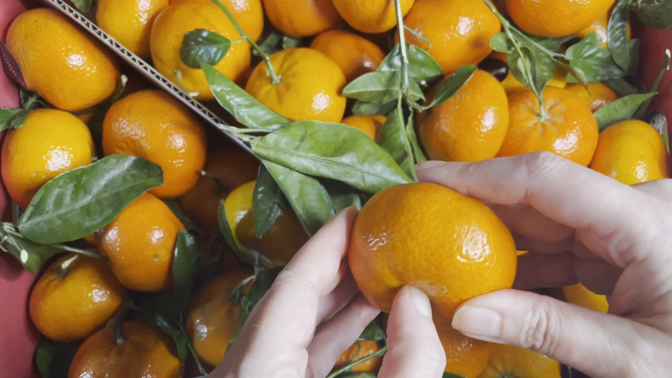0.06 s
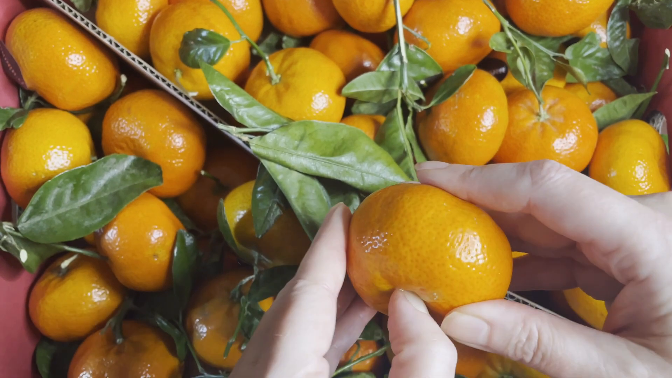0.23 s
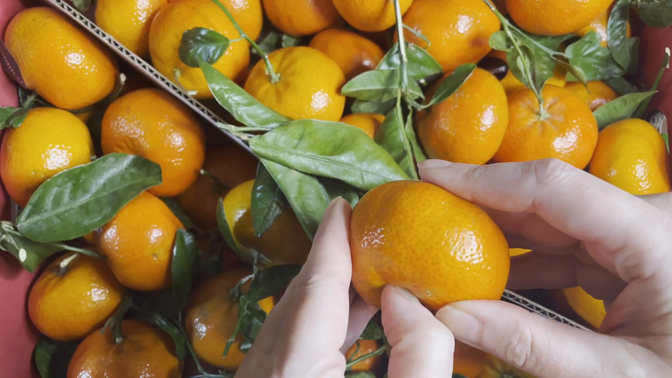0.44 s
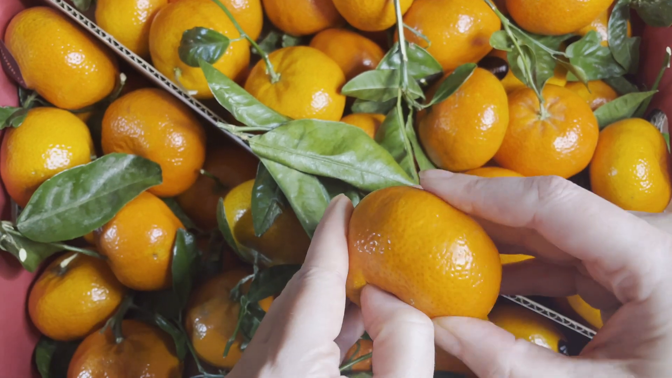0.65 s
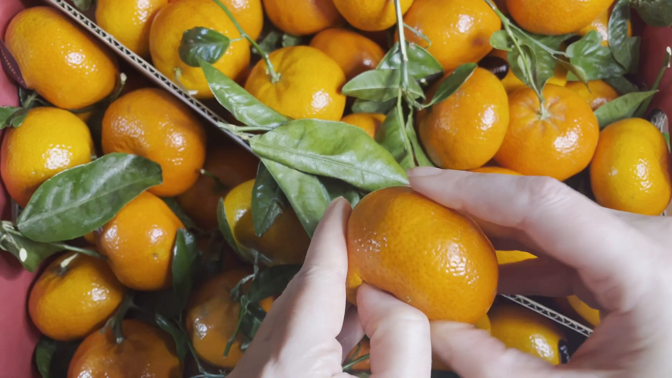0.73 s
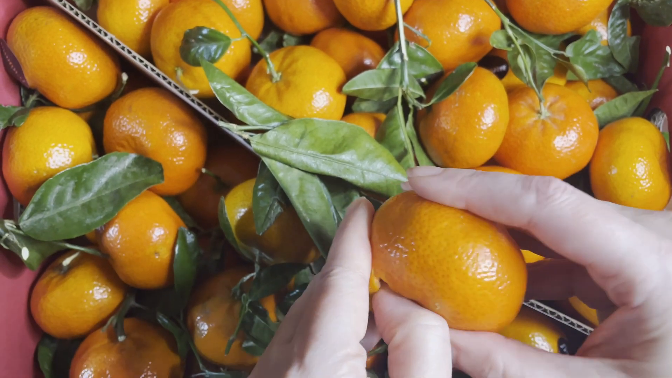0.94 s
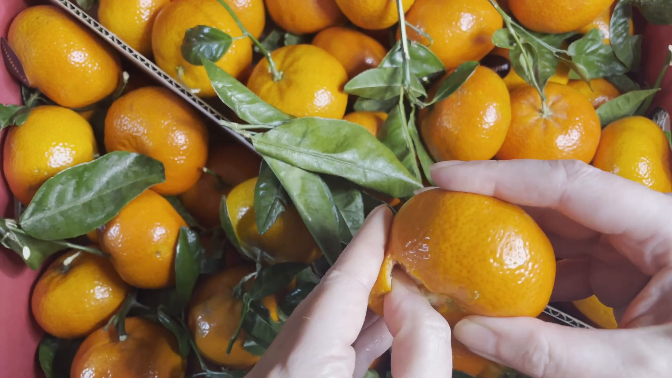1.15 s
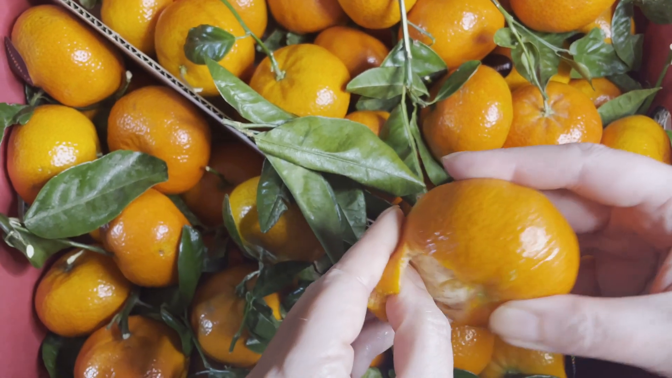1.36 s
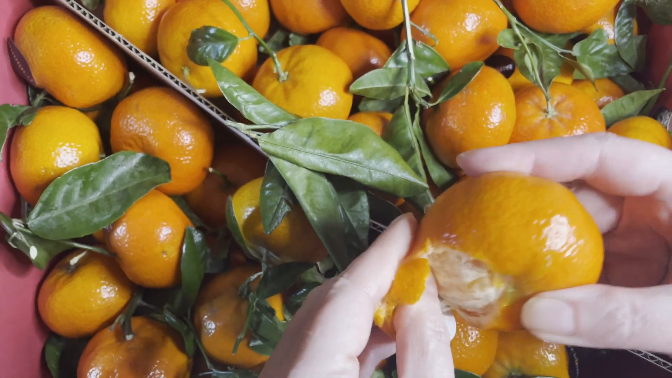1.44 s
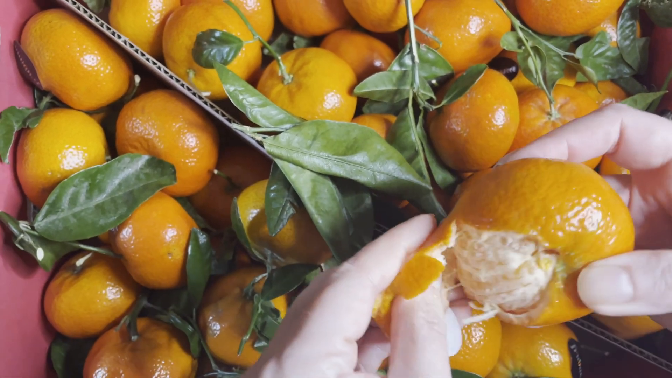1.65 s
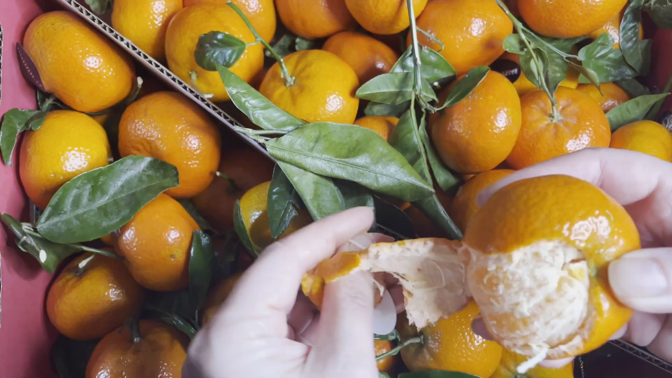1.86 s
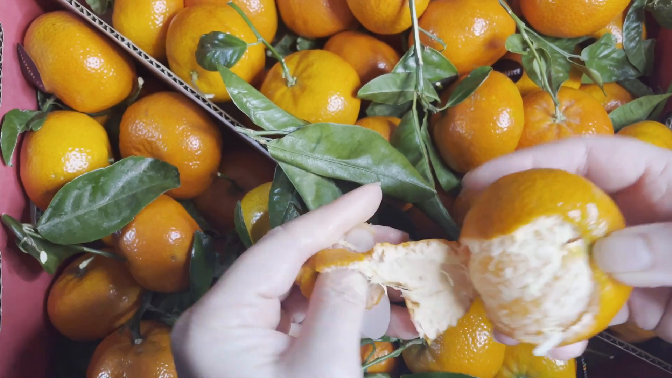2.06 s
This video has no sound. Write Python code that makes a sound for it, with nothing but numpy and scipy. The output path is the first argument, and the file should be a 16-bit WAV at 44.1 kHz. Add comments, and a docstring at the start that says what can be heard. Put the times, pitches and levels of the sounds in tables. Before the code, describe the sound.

Close up, hands tear the peel off a mandarin: a thin squeak and sharp little snaps first, then ticking fibres and brief runs of fine crackle, over the soft, steady hum of a room.

```python
"""A mandarin is peeled by hand, close to a pair of microphones in a humming room.
The moist skin squeaks under the thumb, then bursts in a few sharp snaps. Fibres of pith (the white
layer under the skin) part in ticks and a fine crackle, and the strip of peel flutters as it comes free.
Fingertips rub softly on the rind, and the fruit in the cupped hands rings briefly after each crack."""
import sys
import numpy as np
from scipy import signal
from scipy.fft import rfft, irfft
from scipy.io import wavfile
from scipy.ndimage import uniform_filter1d

SR = 44100
rng = np.random.default_rng(int(sys.argv[2]) if len(sys.argv) > 2 else 0)


def log_audio(samples):
    """Write samples as a 16-bit WAV file to the path given in sys.argv[1]."""
    # one column per channel
    frames = np.atleast_2d(samples).T
    # limit to full scale, then quantise
    limited = np.clip(frames, -1, 1)
    pcm = np.round(limited * 32767).astype(np.int16)
    wavfile.write(sys.argv[1], SR, pcm)


N = 92610
TAPS = 2048  # samples in one filter or one burst
TIME = np.arange(N) / SR
SCENE_HZ, FILTER_HZ = np.fft.rfftfreq(N, 1 / SR), np.fft.rfftfreq(TAPS, 1 / SR)

# Tones of an appliance: pitch_hz, level_db, waver_amount
HUM_TONES = [(59, -61.5, 0), (117, -65, 0.18), (167.8, -68.5, 0.7), (250.37, -52.5, 0.32)]
# Tone colour of the room noise: frequency_hz, gain_db
AIR_COLOUR = [(20, -22), (40, 2.5), (60, 15), (85, 10.5), (140, 5.5), (190, 12), (240, 4), (450, -9.5),
              (900, -21), (2000, -32.5), (10000, -27), (15500, -33.5)]
# Stereo width of the room noise: frequency_hz, side_over_mid_db
AIR_WIDTH = [(50, -14), (200, -3.5), (500, 0.5)]
# Time the room's echo takes to fade by 60 dB: frequency_hz, fade_s
ROOM_FADE = [(300, 0.36), (2000, 0.21), (6000, 0.36), (13000, 0.27)]
# Sound bouncing off the hands and fruit: frequency_hz, gain_db
BOUNCE_COLOUR = [(200, -30), (600, -4), (1400, -14), (5200, -4), (7500, -9), (15000, -22)]
# How the two microphones differ: frequency_hz, left_lead_radians, left_over_right_db
MIC_PAIR = [(0, 0, 2.6), (600, 0, 3.8), (1250, -.2, .8), (2400, .5, 2), (4000, .7, .8), (5200, 1.4, 0),
            (5400, 4.8, 0), (6500, 4.5, 0), (7350, 3.14, 0), (17000, -5.1, 0)]
# Ringing of the fruit and cupped hands: pitch_hz, width_hz, gain_db
HOLLOW_RINGS = [(1447, 260, 0), (2300, 140, -2)]
# Fingertips sliding: middle_s, half_length_s, level_db
FINGER_RUBS = [(0, 0.027, -58.5), (.565, 0.033, -64)]
# Path of the squeak: time_s, pitch_hz, relative_level_db
SQUEAK_PATH = [(.08, 11000, -56), (0.092, 9300, -48.5), (.117, 9030, -46.5), (0.13, 7500, -51),
               (.15, 8320, -51.5), (0.162, 9220, -44.5), (.198, 11830, -49.5)]
# The loose strip sounds lower as it grows: time_s, low_cut_hz
STRIP_LOW_CUT = [(1.1, 1130), (1.8, 447)]
# Tone colour of the pith: frequency_hz, gain_db
PITH_COLOUR = [(100, -24), (400, -5.5), (900, -5), (2000, -1.5), (4500, 1.5), (7000, -1.5), (9000, -2),
               (11500, -4.5), (15500, -16.5)]
# How hard the peel tears: time_s, relative_level_db
TEAR_STRENGTH = [(.2, -75.5), (.35, -91), (.5, -84.5), (.6, -68.5), (.85, -76.5), (.95, -67), (1.03, -70),
                 (1.11, -50.5), (1.2, -69), (1.28, -68), (1.36, -47), (1.42, -62), (1.46, -55),
                 (1.55, -71.5), (1.62, -55), (1.66, -56.5), (1.705, -45.5), (1.75, -55.5), (1.8, -59),
                 (1.85, -76)]
# Single fibres parting: time_s, relative_level_db, brightness_db_per_octave
FIBRE_TICKS = [ (0.077, -46, -9.5), (0.547, -48.5, -2.5), (0.599, -52.5, -8), (0.686, -44.5, 6),
               (0.7867, -38.5, -3), (0.817, -43.5, 11), (0.8994, -39, -1.5), (0.937, -47, -13),
               (0.9737, -39, 3), (1.0432, -39.5, -1.5), (1.0495, -34.5, 6.5), (1.0614, -38.5, 0.5),
               (1.0647, -34.5, -6), (1.0672, -43, 14), (1.0849, -31.5, 11), (1.1049, -34.5, 7),
               (1.11, -39.5, -6.5), (1.1351, -40, 1.5), (1.1552, -36, 0.5), (1.2718, -39, 0),
               (1.294, -29.5, 10.5), (1.3, -37.5, 3.5), (1.3326, -37, 4), (1.3415, -40, 2),
               (1.3654, -29, -1), (1.379, -45, -2), (1.402, -34, 5.5), (1.451, -40.5, 0.5),
               (1.4683, -32.5, -3.5), (1.4805, -34, -2), (1.5748, -36, 3.5), (1.579, -40, -3),
               (1.5916, -30.5, 10.5), (1.612, -38.5, -1), (1.6233, -32.5, 1.5), (1.6359, -30.5, 0.5),
               (1.681, -37, -2.5), (1.692, -41, -3), (1.703, -39, -9), (1.71, -40.5, -4.5),
               (1.7202, -42.5, -3), (1.738, -38, -1.5), (1.742, -41, 3), (1.7653, -32.5, -2.5),
               (1.7925, -37.5, -1), (1.81, -42, -4.5)]
# Tone colour of the skin: frequency_hz, gain_db
SKIN_COLOUR = [(100, 4), (1000, -1), (1500, -4.5), (1900, -10.5), (2400, -2.5), (3400, -5), (4600, 2),
               (8800, 2.5), (12000, 5.5), (15000, -0.5), (16500, 0)]
# Skin bursting: time_s, relative_level_db, rise_ms, decay_ms, low_cut_hz, 3 x (ring_hz, full_boost_db)
SKIN_SNAPS = [ (0.202, -1.5, 0.085, 0.77, 5900, 6350, 4.9, 7300, 6, 14000, 9),
              (0.2146, -9.5, 0.23, 1.3, 4840, 6100, 2.2, 7400, 6, 11200, 11),
              (0.2535, -6.5, 0.64, 0.59, 600, 6090, 16.8, 7510, 16.6, 10600, 19.3),
              (0.6527, -5.5, 0.1, 1.73, 1060, 1580, 12.8, 6530, 15, 10100, 9.3),
              (1.3178, -5.5, 0.69, 2.5, 1330, 4290, 13, 6240, 9.8, 7600, 7.5),
              (1.3561, -1.5, 1, 0.66, 1120, 2230, 14, 3780, 16.3, 10400, 5)]

GRAINS_PER_S = 1300  # tiny clicks in the crackle
TILT_PIVOT_HZ = 4000  # brightness slopes turn around this frequency


def amp(db):
    """Turns decibels into a number to multiply by."""
    return 10 ** (np.asarray(db) / 20)


def unit(x):
    """Scales a signal to an average (rms) level of 1."""
    return x / np.sqrt(np.mean(x ** 2) + 1e-20)


def read(points, hz):
    """Reads between the rows of a table, giving each octave equal room."""
    row_hz, value = np.transpose(points)
    return np.interp(np.log(hz + 1), np.log(row_hz + 1), value)


def add(mix, start_s, sound):
    """Mixes a sound in at the given time."""
    start = round(start_s * SR)
    sound = sound[max(-start, 0):]
    part = mix[max(start, 0):][:len(sound)]
    part += sound[:len(part)]


def colour(x, db):
    """Turns each frequency in FILTER_HZ up or down by db, with no ringing ahead of the sound."""
    log_gain = np.log(amp(np.maximum(db, -100)))
    mirrored = np.concatenate([log_gain, log_gain[-2:0:-1]])
    taps = np.fft.ifft(np.exp(np.conj(signal.hilbert(mirrored)))).real
    return signal.fftconvolve(x, taps)[:len(x)]


def low_cut(hz, steepness=6):
    """A curve in dB that weakens everything below hz."""
    return -10 * np.log10(1 + (hz / (FILTER_HZ + 1)) ** steepness)


def hump(hz):
    """A curve in dB that keeps a broad band around hz."""
    return -10 * np.log2((FILTER_HZ + 1) / hz) ** 2


def drift(hz):
    """A smooth random wobble; higher hz makes it faster."""
    return unit(irfft(rfft(rng.standard_normal(N)) * np.exp(-(SCENE_HZ / hz) ** 2), N))


def pair(mid, side):
    """Makes left and right from what they share (mid) and how they differ (side)."""
    return np.array([mid + side, mid - side])


def burst(rise_ms, decay_ms, crack):
    """Cells pop in a quick run around one main crack, TAPS / 2 samples in."""
    ms = (np.arange(TAPS) - TAPS // 2) * 1000 / SR
    pops = rng.standard_normal(TAPS) * np.exp(np.minimum(ms / rise_ms, -ms / decay_ms))
    spectrum = rfft(pops / np.linalg.norm(pops) + crack * (ms == 0))
    power = uniform_filter1d(abs(spectrum) ** 2, size=31)
    return irfft(spectrum / np.sqrt(power + 1e-12))  # even from bass to treble


def hum(waver_hz=10.8):
    """An appliance hums in low tones, most of them wavering."""
    tones = 0
    for hz, db, waver in HUM_TONES:
        phase = 2 * np.pi * (hz * TIME + rng.random())
        tone = (1 + waver * drift(waver_hz)) * np.cos(phase) + waver * drift(waver_hz) * np.sin(phase)
        tones += amp(db) * unit(tone)
    return tones


def room_noise(level_db=-60):
    """A soft, low rush fills the room, wider in the treble than in the bass."""
    gain = amp(read(AIR_COLOUR, SCENE_HZ))
    mid, side = (unit(irfft(rfft(rng.standard_normal(N)) * gain, N)) for _ in range(2))
    return amp(level_db) * pair(mid, colour(side, read(AIR_WIDTH, FILTER_HZ)))


def room_echo(x, delay_s=0.006):
    """The room adds a smooth tail, each frequency fading at its own speed."""
    hz, seconds, noise = signal.stft(rng.standard_normal(SR // 2), SR, nperseg=256)
    fade = amp(-60 * seconds / read(ROOM_FADE, hz)[:, None])
    tail = signal.istft(noise * fade, SR, nperseg=256)[1]
    tail = np.concatenate([np.zeros(round(delay_s * SR)), tail])
    return signal.fftconvolve(x, tail / np.linalg.norm(tail))[:N]


def hand_bounces(x):
    """Sound bounces off the hands and fruit in a quick cluster of echoes."""
    echoes = signal.fftconvolve(x, burst(rise_ms=0.1, decay_ms=1, crack=0))[TAPS // 2:][:N]
    return colour(echoes, read(BOUNCE_COLOUR, FILTER_HZ))


def hollow(x):
    """The fruit cupped in the hands rings briefly after each crack."""
    return x + sum(amp(db) * signal.lfilter(*signal.iirpeak(hz, hz / width_hz, SR), x)
                   for hz, width_hz, db in HOLLOW_RINGS)


def finger_rubs():
    """Fingertips slide softly over the rind as the grip shifts."""
    level = sum(amp(db) * np.exp(-((TIME - middle_s) / half_length_s) ** 2)
                for middle_s, half_length_s, db in FINGER_RUBS)
    return level * unit(colour(rng.standard_normal(N), hump(hz=1498)))


def peel_flutter(start_s=1.68, end_s=1.83, level_db=-64):
    """The soft strip of peel flutters as it comes free."""
    swell = np.sin(np.pi * np.clip((TIME - start_s) / (end_s - start_s), 0, 1))
    grains = rng.standard_normal(N) * (rng.random(N) < GRAINS_PER_S / 2 / SR)
    return amp(level_db) * swell * unit(colour(grains, hump(hz=505)))


def thumb_squeak(gain_db=-1.5, width_hz=840, slips_per_s=120, slip_depth=0.9, fizz_db=-5):
    """Moist skin slips under the thumb in a thin, stuttering whistle that dips and rises."""
    times, hz, db = np.transpose(SQUEAK_PATH)
    phase = 2 * np.pi * np.cumsum(np.interp(TIME, times, hz)) / SR
    whistle = drift(width_hz / 2) * np.cos(phase) + drift(width_hz / 2) * np.sin(phase)
    treble_band = signal.butter(2, [7000, 13000], "band", fs=SR, output="sos")
    fizz = unit(signal.sosfilt(treble_band, rng.standard_normal(N)))
    slips = np.exp(slip_depth * np.cos(2 * np.pi * slips_per_s * TIME + 2 * drift(slips_per_s / 2)))
    level = amp(gain_db + np.interp(TIME, times, db)) * (TIME > times[0]) * (TIME < times[-1])
    return level * unit((whistle + amp(fizz_db) * fizz) * slips)


def fibre_rings(depth_db=4.2):
    """Each fibre rings at its own chance pitches: a bumpy curve in dB."""
    bumps = uniform_filter1d(rng.standard_normal(len(FILTER_HZ)), size=25)
    return depth_db * unit(uniform_filter1d(bumps, size=19))


def pith_crackle(gain_db=2.5, spread_db=5, clump_db=2.5, tilt_db_per_octave=-1, kinds=12):
    """Fine fibres give way in uneven clumps as the peel lifts."""
    size_db = spread_db * np.minimum(rng.exponential(1, N), 3) + clump_db * drift(hz=120)
    grains = amp(size_db) * rng.choice([-1, 1], N) * (rng.random(N) < GRAINS_PER_S / SR)
    kind = rng.integers(0, kinds, N)
    octaves = np.log2((FILTER_HZ + 1) / TILT_PIVOT_HZ).clip(-4)
    shape = read(PITH_COLOUR, FILTER_HZ) + tilt_db_per_octave * octaves
    full = sum(colour(grains * (kind == k), shape + fibre_rings()) for k in range(kinds))
    times, low_hz = np.transpose(STRIP_LOW_CUT)
    thin = colour(full, low_cut(low_hz[0]))
    looseness = np.interp(TIME, times, [0, 1]) ** 2  # a longer strip lets in more bass
    level = amp(gain_db + np.interp(TIME, *np.transpose(TEAR_STRENGTH)))
    return level * unit(thin + looseness * (full - thin))


def pith_ticks(gain_db=13.5):
    """Single fibres of pith part, some dull and some bright."""
    out = np.zeros(N)
    octaves = np.log2(np.maximum(FILTER_HZ, 1000) / TILT_PIVOT_HZ)
    for time_s, db, brightness in FIBRE_TICKS:
        low_hz = np.interp(time_s, *np.transpose(STRIP_LOW_CUT))
        shape = read(PITH_COLOUR, FILTER_HZ) + brightness * octaves + low_cut(low_hz)
        tick = colour(burst(rise_ms=0.12, decay_ms=0.55, crack=1.2), shape + fibre_rings())
        add(out, time_s - TAPS / 2 / SR, amp(db + gain_db) * tick / np.linalg.norm(tick))
    return out


def skin_snaps(ring_share, gain_db=-1):
    """The skin bursts; each split rings briefly at its own pitches."""
    out = np.zeros(N)
    for time_s, db, rise_ms, decay_ms, low_hz, *rings in SKIN_SNAPS:
        shape = read(SKIN_COLOUR, FILTER_HZ) + np.maximum(low_cut(low_hz, steepness=12), -30)
        for ring_hz, boost_db in zip(rings[::2], rings[1::2]):
            width_hz = 250 + 0.04 * ring_hz
            shape += ring_share * boost_db * np.exp(-((FILTER_HZ - ring_hz) / width_hz) ** 2)
        snap = colour(burst(rise_ms, decay_ms, crack=0.86), shape)
        add(out, time_s - TAPS / 2 / SR, amp(db + gain_db) * snap)
    return out


def scene(echo_db=-14, echo_side_db=-17, dull_above_hz=11000):
    """Mixes the peeling with its echoes, the hum and the room noise."""
    small_sounds = pith_ticks() + pith_crackle() + peel_flutter() + thumb_squeak() + finger_rubs()
    peel = hollow(small_sounds + skin_snaps(ring_share=0.98))
    # The room gets the snaps from all sides, duller and with their rings evened out.
    into_room = hollow(small_sounds + skin_snaps(ring_share=0.4))
    into_room = colour(into_room, -10 * np.log10(1 + (FILTER_HZ / dull_above_hz) ** 2))
    close = pair(peel, hand_bounces(peel))
    echo = pair(room_echo(into_room), amp(echo_side_db) * room_echo(into_room))
    return close + amp(echo_db) * echo + hum() + room_noise()


def record(dry, cutoff_hz=16250):
    """Two spaced microphones hear slightly different timing and level; the highest treble is cut."""
    hz, lead_radians, left_db = np.transpose(MIC_PAIR)
    phase, balance_db = np.interp(FILTER_HZ, hz, lead_radians), np.interp(FILTER_HZ, hz, left_db)
    response = amp([balance_db / 2, -balance_db / 2]) * np.exp(0.5j * np.array([phase, -phase]))
    mic_filters = np.fft.fftshift(irfft(response), axes=1)
    heard = signal.fftconvolve(dry, mic_filters, axes=1)[:, TAPS // 2:][:, :N]
    treble_cut = signal.firwin(161, cutoff_hz, window=("kaiser", 9), fs=SR)
    return signal.oaconvolve(heard, treble_cut[None], "same")


dry = scene()
out = record(dry)
log_audio(out)
```